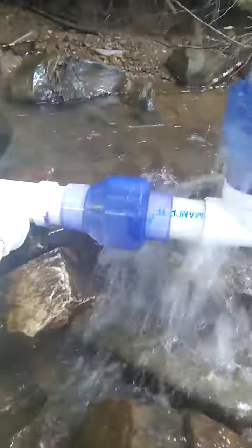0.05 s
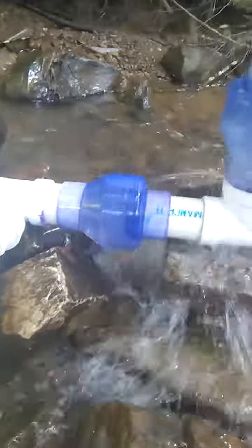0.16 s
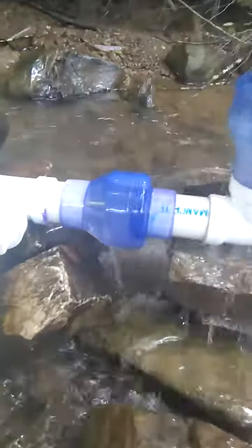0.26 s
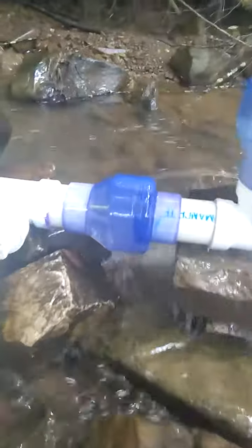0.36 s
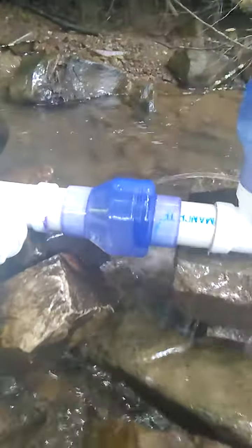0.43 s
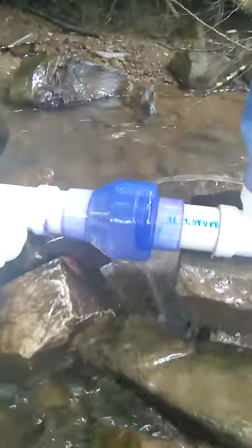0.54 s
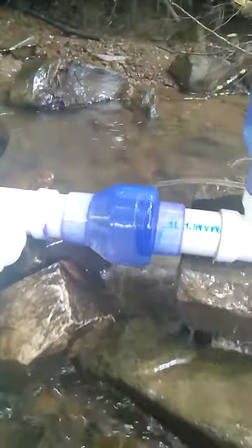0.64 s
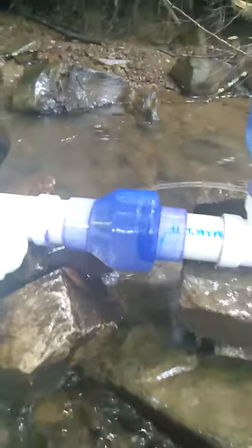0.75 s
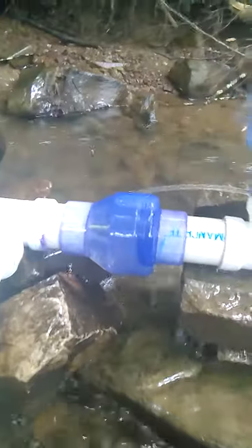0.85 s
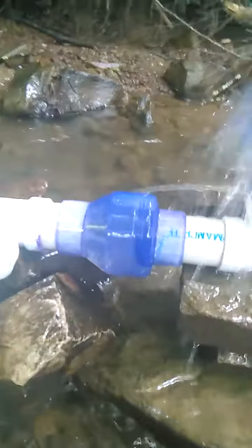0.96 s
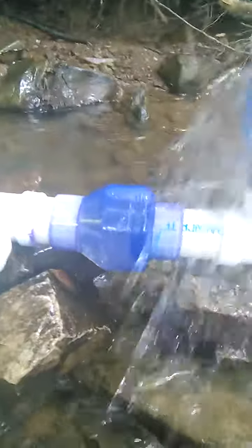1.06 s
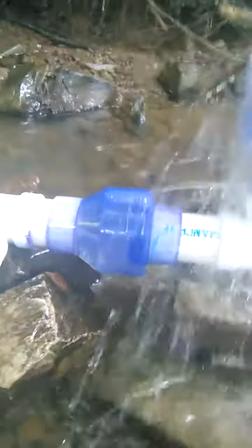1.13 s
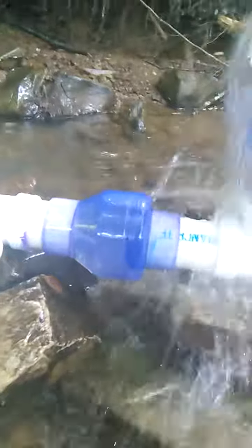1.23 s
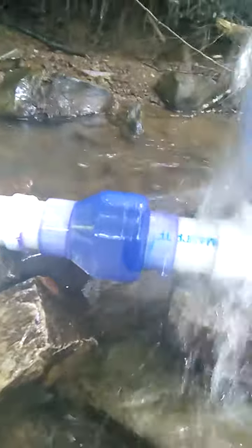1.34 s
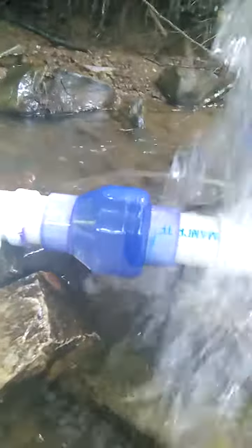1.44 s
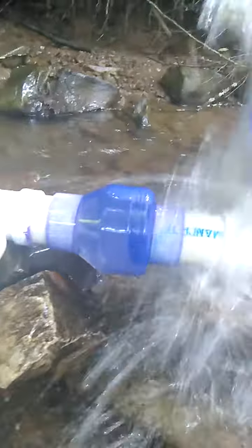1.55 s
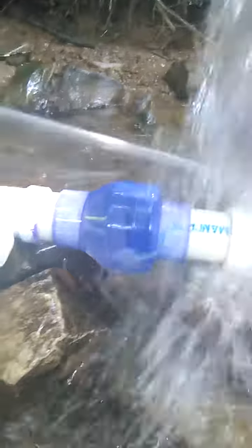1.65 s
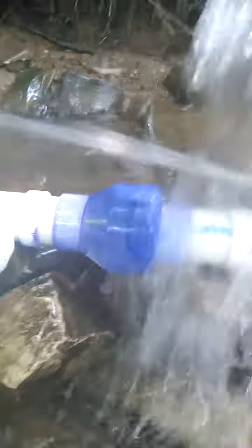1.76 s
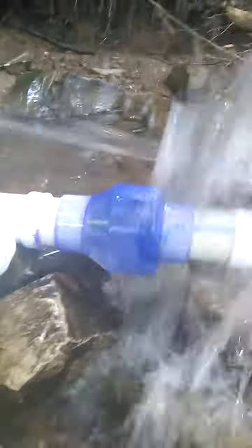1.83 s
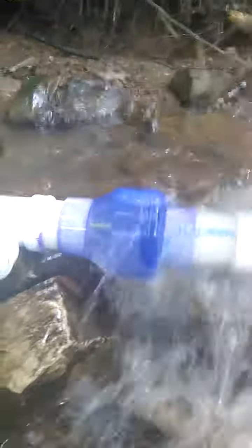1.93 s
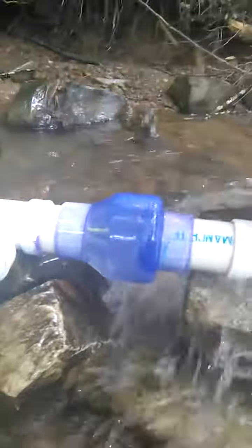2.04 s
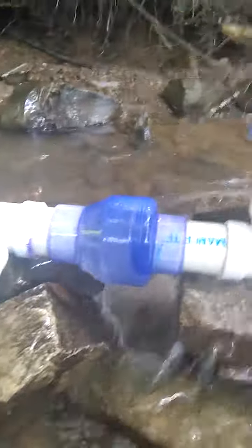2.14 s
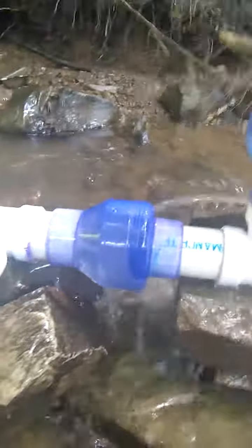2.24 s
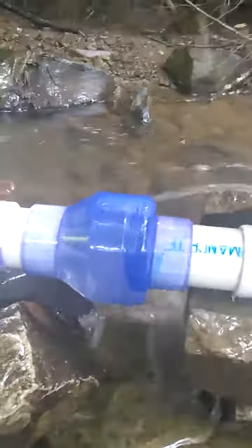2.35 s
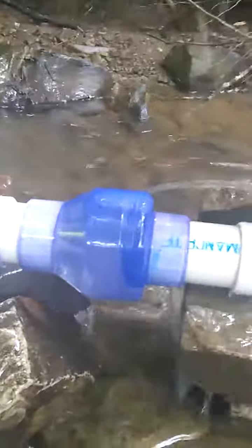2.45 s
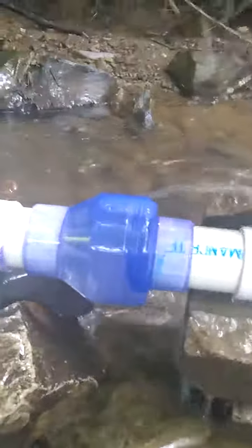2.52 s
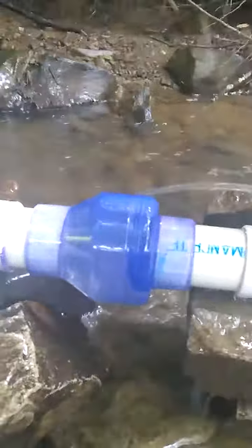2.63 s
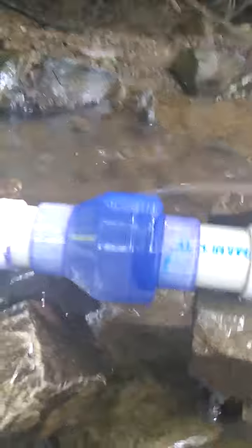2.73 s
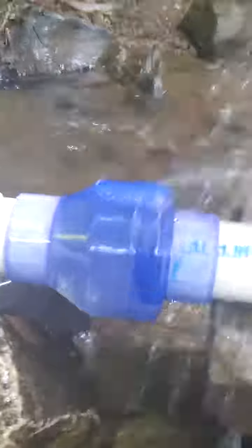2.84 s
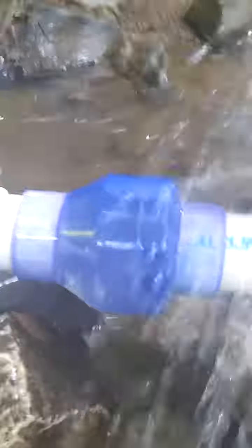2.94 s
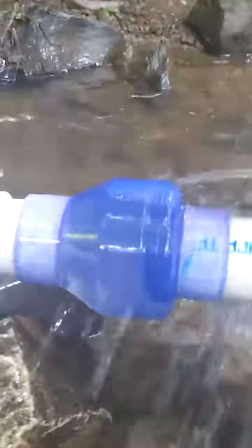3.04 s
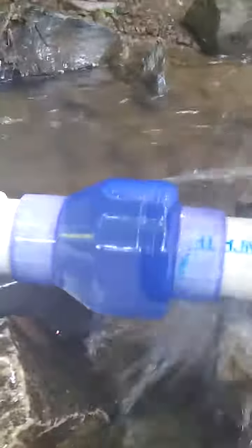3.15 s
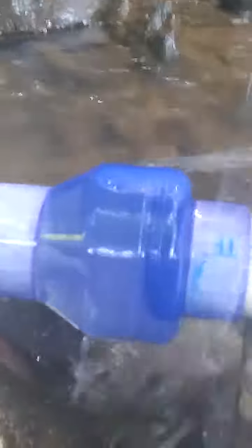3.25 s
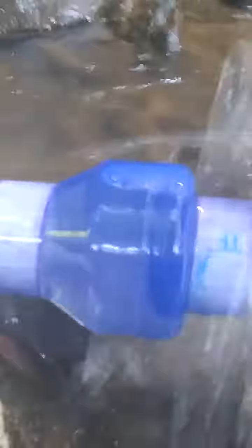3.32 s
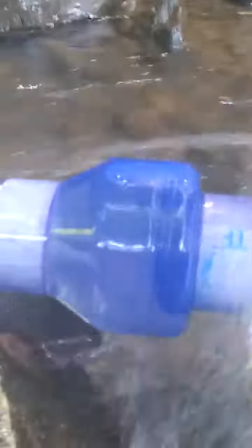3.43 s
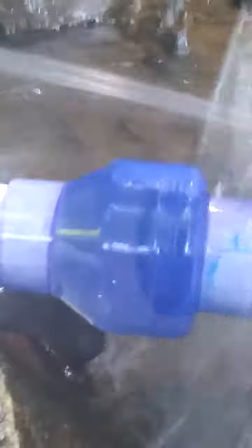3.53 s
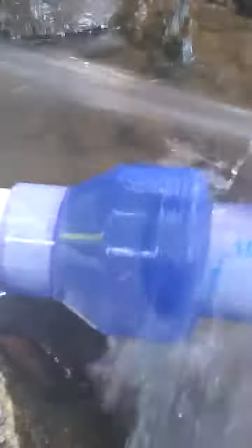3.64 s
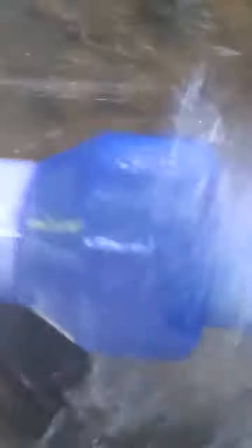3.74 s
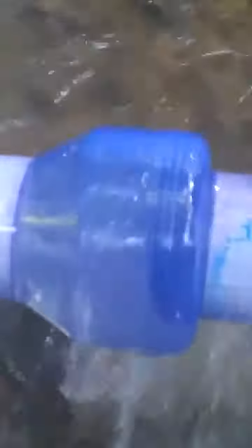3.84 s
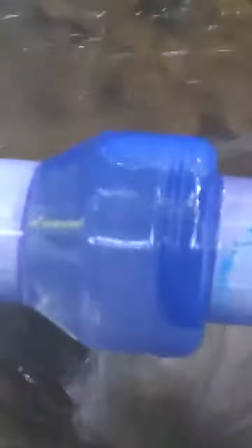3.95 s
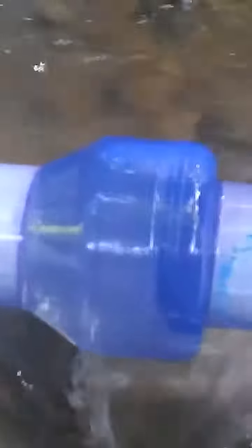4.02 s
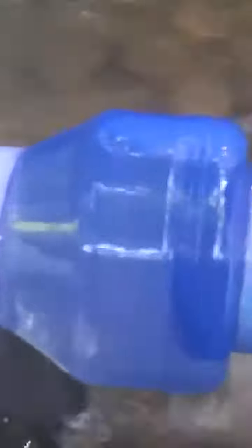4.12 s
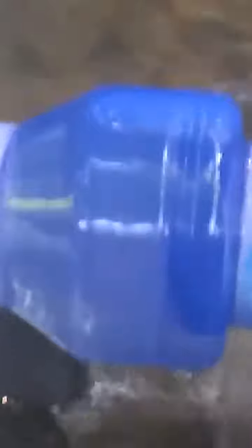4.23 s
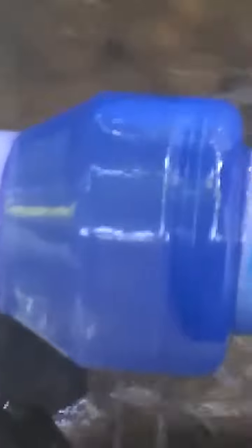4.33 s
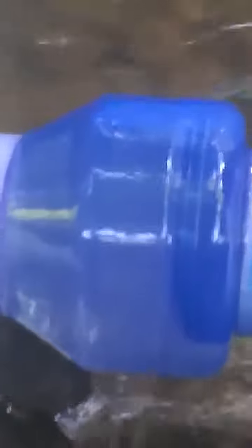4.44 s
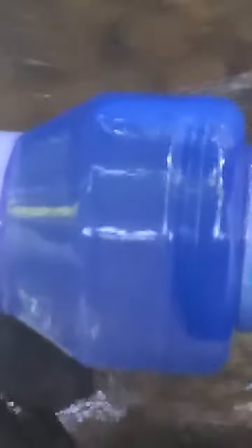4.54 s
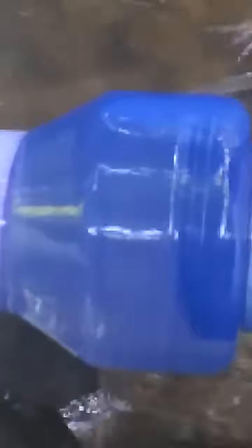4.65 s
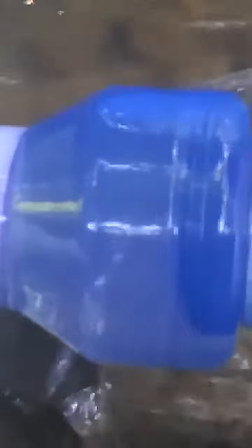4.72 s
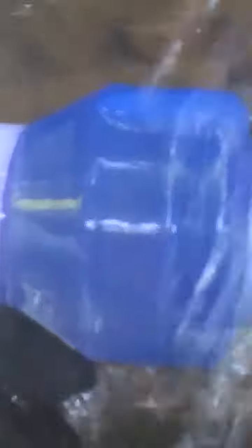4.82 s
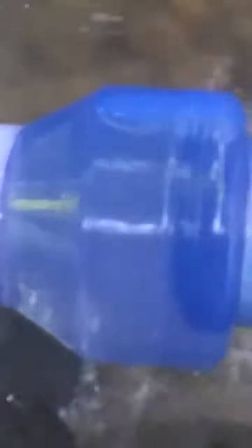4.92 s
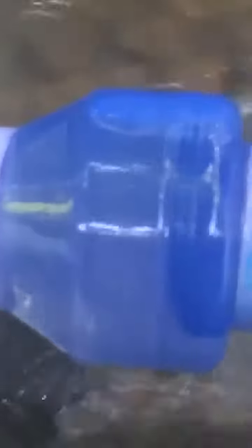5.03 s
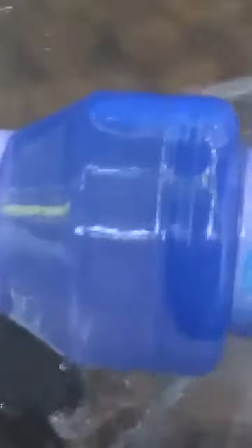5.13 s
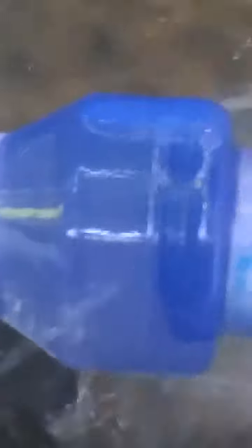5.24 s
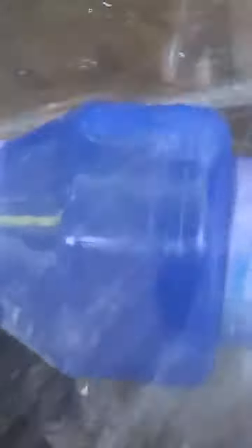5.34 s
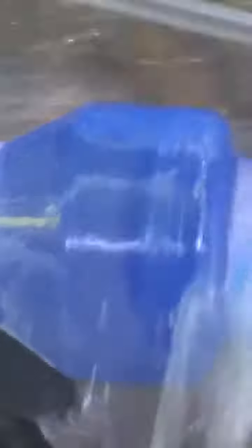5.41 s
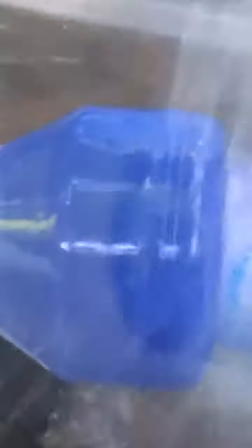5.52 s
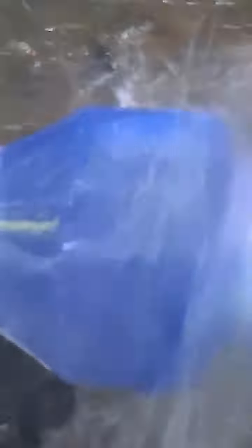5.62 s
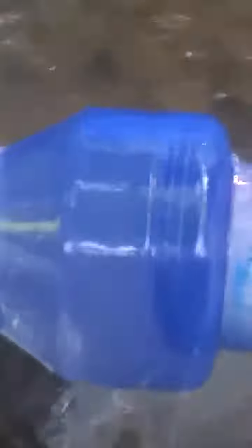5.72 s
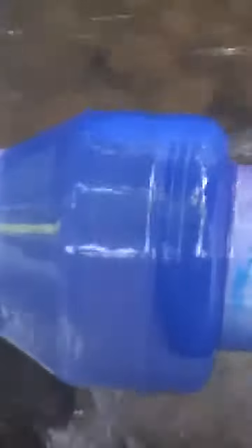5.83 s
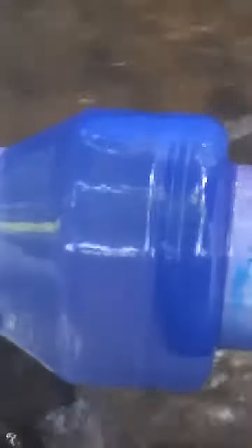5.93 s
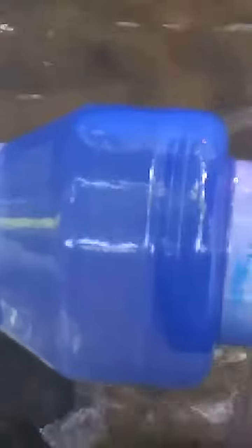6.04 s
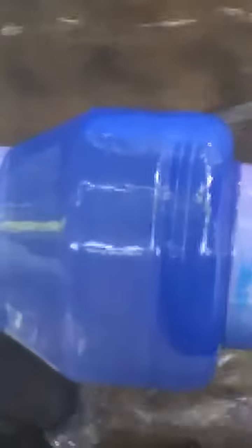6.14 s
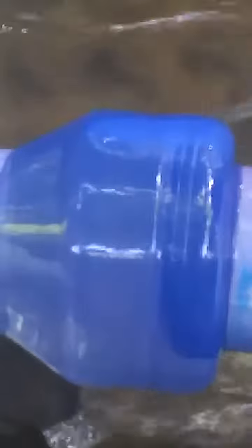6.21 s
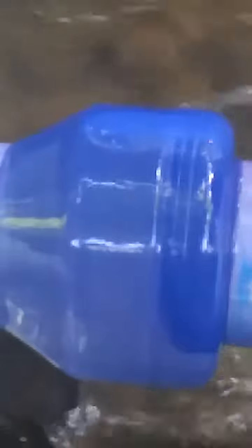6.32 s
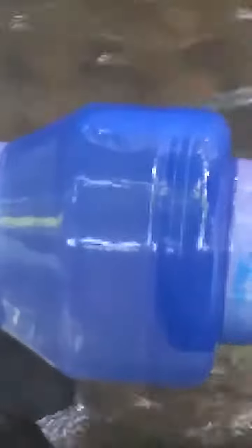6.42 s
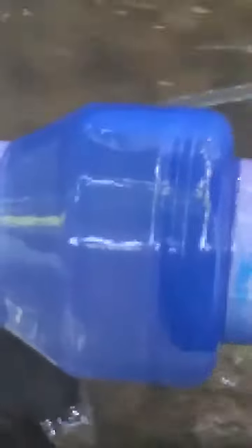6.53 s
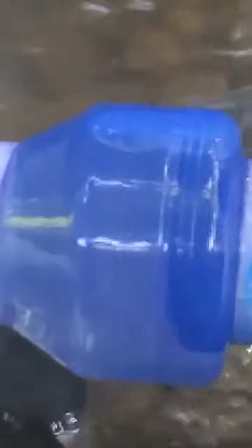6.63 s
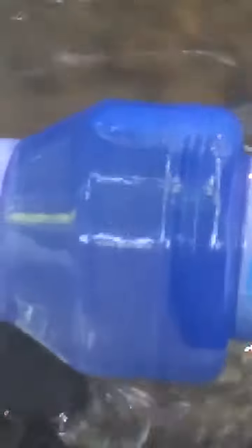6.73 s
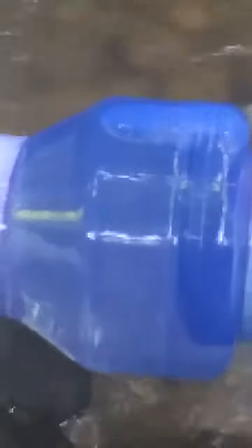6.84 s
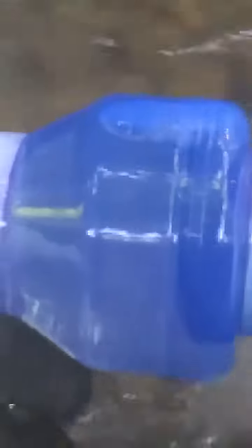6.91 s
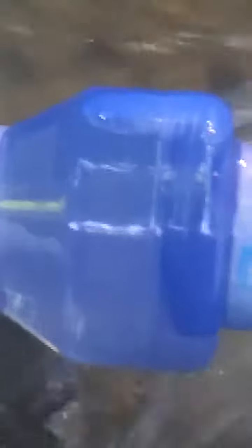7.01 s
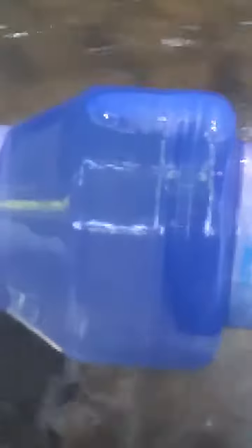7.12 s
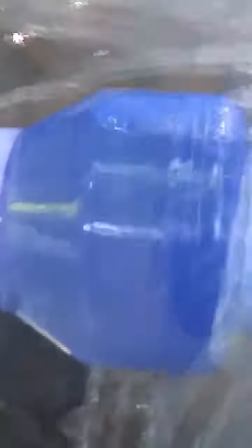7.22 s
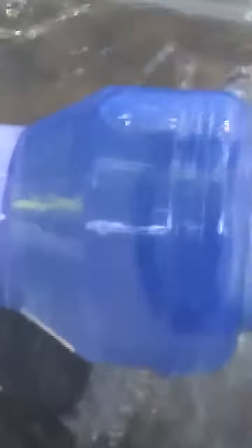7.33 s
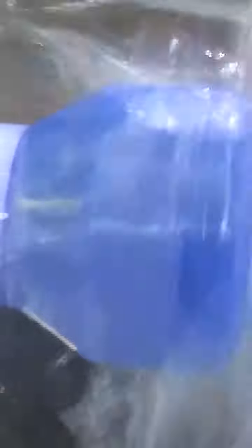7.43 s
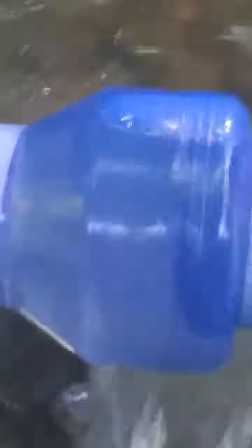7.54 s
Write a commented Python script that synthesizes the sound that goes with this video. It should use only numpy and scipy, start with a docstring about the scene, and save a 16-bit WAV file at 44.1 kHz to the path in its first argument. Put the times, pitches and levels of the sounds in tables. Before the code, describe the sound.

A tail of a hissing gush sounds at the very start and cuts off at about 0.1 s, leaving drips and a steady babbling creek with hollow glugs and low handling rumble. At 1.0 s water spurts again, splattering on stones, surging around 1.5 to 1.8 s with sharp splats, a dull pipe thud and thumping finger bumps, then stops near 2.0 s. A few more bumps follow over gurgling water. The next gush runs from 2.9 to 3.9 s, with bright plips and a hard splat at 3.5 s. A faint far engine climbs in pitch from about 2 s, shifts gear near 5.6 s and fades by 6.6 s. Further gushes run 4.8 to 5.8 s and from 6.7 s to the end at about 7.5 s, still spraying. Close, outdoors, crisp hiss over soft stream wash, wide stereo with the spray brighter at left and handling mostly at right.

```python
"""A gush of water hisses and splatters on stones over a babbling creek, and is cut off almost at once.
A ram pump throws out such a gush about every two seconds until its valve shuts: drop-shaped noise makes
the spray and splash, noise bursts the big drops, damped tones the plips. The creek is noise and bubbles.
A far engine, gliding tones, pulls away; fingers bump and rub the phone, heard as thumps and low noise.
Its two microphones are wired in opposite polarity; the left one sits behind a resonant port."""
import sys
import numpy as np
from scipy import signal
from scipy.fft import rfft, irfft, next_fast_len
from scipy.io import wavfile
from scipy.ndimage import uniform_filter1d, map_coordinates

SR = 44100
rng = np.random.default_rng(int(sys.argv[2]) if len(sys.argv) > 2 else 0)


def dump_mix(stems):
    """Bounce the given channels to the path in sys.argv[1] as a 16-bit WAV at rate SR."""
    frames = np.atleast_2d(stems).T  # one column per channel
    limited = np.clip(frames, -1, 1)  # hard clip at full scale
    pcm = np.round(limited * 32767).astype(np.int16)
    wavfile.write(sys.argv[1], SR, pcm)


N = 333837
T = np.arange(N) / SR
SLOW = T[::64]  # time grid of the slow controls, s

# spectrum of fine spray: f/Hz, relative density/dB
SPRAY_SPECTRUM = [(2500, -33), (4500, -5.5), (6500, -3), (8500, 1.5), (11000, 0), (12500, -2.5),
                  (14300, -6)]
# spectrum of heavier water on stones: f/Hz, relative density/dB
SPLASH_SPECTRUM = [(100, -75), (300, -43), (600, -18), (1000, -11), (2000, -4.5), (3400, -1), (5000, -2),
                   (7000, -2.5), (11000, -21)]


def amp(db):
    """dB to amplitude factor."""
    return 10 ** (np.asarray(db) / 20)


def unit(x):
    """Scales to an RMS of 1 over all channels."""
    return x / np.sqrt(np.mean(x ** 2) + 1e-20)


def along(points, hz):
    """(f/Hz, value) points read on a log frequency axis."""
    f_hz, value = np.transpose(points)
    return np.interp(np.log(hz + 1), np.log(f_hz + 1), value)


def curves(rows):
    """One value per sample for each column after the time."""
    s, *columns = np.transpose(rows)
    return [np.interp(T, s, column) for column in columns]


def wobble(knots_per_s):
    """Smooth random curve through normally distributed knots."""
    knots = rng.standard_normal(int(N * knots_per_s / SR) + 4)
    return map_coordinates(knots, [T * knots_per_s])


def filtered(x, response):
    """Applies a complex response of frequency to x."""
    m = next_fast_len(N + 8192)
    hz = np.fft.rfftfreq(m, 1 / SR)
    return irfft(rfft(x, m) * response(hz), m)[..., :N]


def patchy(patch_rms_db):
    """Two white noises that share time-frequency patches of random gain."""
    z = signal.stft(rng.standard_normal((2, N)), nperseg=256)[2]
    field = rng.standard_normal(z.shape[1:])
    field = uniform_filter1d(field, 4, 0)  # over frequency
    field = uniform_filter1d(field, 8, 1)  # over time
    return signal.istft(z * amp(patch_rms_db * unit(field)), nperseg=256)[1][:, :N]


def heard(pair, spectrum):
    """Colours two sources and mixes them so the microphones agree by frequency, best in the bass."""
    # agreement of the microphones: f/Hz, coherence/0-1
    agreement = [(100, 0.98), (350, 1), (700, 0.9), (1100, 0.58), (1700, .45), (2300, 0.7), (3400, 0.6),
                 (4200, 0), (14000, 0.18)]
    colour = lambda hz: amp(along(spectrum, hz))
    alike = lambda hz: np.clip(along(agreement, hz), 0, 1)
    left = filtered(pair[0], colour)
    shared = filtered(pair[0], lambda hz: colour(hz) * alike(hz))
    own = filtered(pair[1], lambda hz: colour(hz) * np.sqrt(1 - alike(hz) ** 2))
    return np.array([left, shared + own])


def patter(drops_per_s, spread_db, t60_s):
    """Power envelope of mean 1: drops land at random, each a sudden start and a quick decay."""
    sizes = amp(2 * spread_db * rng.exponential(size=N))
    hits = sizes * (rng.random(N) < drops_per_s / SR)
    power = signal.lfilter([1], [1, -amp(-120 / (t60_s * SR))], hits)
    return power / power.mean()


def bubbles(s, db, hz, t60_s, rise, attack):
    """Damped tones whose pitch climbs as the bubble nears the surface."""
    t = np.arange(int(min(t60_s.max(), .1) * SR)) / SR
    u = t / t60_s[:, None]  # age in decay times
    tone = np.sin(2 * np.pi * hz[:, None] * t * (1 + rise * u))
    tone = tone * amp(db[:, None] - 60 * u) * (1 - np.exp(-u / attack))
    at = (s * SR).astype(int)[:, None] + np.arange(len(t))
    return np.bincount(at.ravel(), tone.ravel(), N + SR)[:N]


def thumps(rows, decay):
    """Each thump is a cycle or two that slows down."""
    out, t = np.zeros(N + SR), np.arange(SR // 10) / SR
    for s, db, hz in rows:
        u = hz * t
        thump = amp(db) * np.sin(2 * np.pi * 1.25 * u ** 0.575) * np.exp(-decay * u)
        out[round(s * SR):][:len(t)] += thump
    return out[:N]


def engine():
    """Low tones of a far engine that speeds up, then drops to a higher gear."""
    # before the gear change: t/s, firing f/Hz, firing level/dB, octave level/dB
    pulling = [(1.6, 78.3, -82, -85), (2.3, 104.3, -59, -82), (3.0, 118.2, -60, -79), (3.5, 134, -61, -76),
               (4.2, 163, -61, -66), (4.5, 172.6, -77, -61), (4.9, 193, -76, -62), (5.4, 205.6, -83, -59),
               (5.6, 204, -90, -87)]
    # after it: t/s, f/Hz (only 2f and 3f sound), level/dB
    geared = [(5.6, 70, -88), (5.8, 73, -66), (6.1, 77, -59), (6.6, 81, -85)]
    hz, firing_db, octave_db = curves(pulling)
    phase = 2 * np.pi * np.cumsum(hz + 0.42 * wobble(4.8)) / SR
    firing = amp(firing_db + 1.2 * wobble(5.2)) * np.sin(phase)
    octave = amp(octave_db + 1.5 * wobble(4.1)) * np.sin(2 * phase)
    hz, db = curves(geared)
    phase = 2 * np.pi * np.cumsum(hz) / SR
    harmonics = 0.71 * np.sin(2 * phase) + 0.89 * np.sin(3 * phase)
    return firing + octave + amp(db + 1.6 * wobble(23)) * harmonics


def creek():
    """A steady wash with many small bubbles and a few large ones."""
    # wash spectrum: f/Hz, relative density/dB
    wash_spectrum = [(30, -33), (60, -2.5), (170, -8.5), (260, -6.5), (500, -2), (700, -1), (1000, -3),
                     (1700, -7), (2600, -13.5), (4500, -14), (8500, -9.5), (11000, -13.5), (14300, -20)]
    # large bubbles: t/s, level/dB, start f/Hz, t60/s
    glugs = [(.47, -38, 550, .12), (.52, -46, 696, 0.067), (1.89, -41, 720, .06), (2.24, -35, 536, 0.12),
             (2.51, -41, 557, 0.11), (3.13, -40, 688, 0.12), (3.23, -37, 536, .08), (3.38, -38, 810, 0.067),
             (4.73, -36, 547, 0.087), (5.38, -42, 600, 0.093), (5.6, -40, 440, 0.15),
             (7.14, -44, 810, 0.089), (7.417, -42, 462, .09)]
    trickle = np.sqrt(2.1 + 0.1 * patter(400, spread_db=1.0, t60_s=0.0044))
    wash = unit(heard(patchy(3.0) * trickle, wash_spectrum))
    wash = amp(-52.5 + 0.82 * wobble(3.06)) * wash * amp([[2.5], [0]])
    u = rng.random((900, 3))
    hz = np.clip(600 * amp(3.53 * rng.standard_normal(900)), 300, 2000)
    t60_s = 35 / hz * (1.2 + u[:, 2])
    babble = bubbles(u[:, 0] * N / SR, -62 + 11 * u[:, 1] ** 2, hz, t60_s, rise=0.17, attack=0.017)
    large = bubbles(*np.transpose(glugs), rise=.3, attack=0.02)
    return wash + (babble + large) * amp([[-.8], [0]])


def handling():
    """Finger bumps and rumble reach the microphones through the case, the right one far more."""
    # bumps: t/s, level/dB before decay, nominal f/Hz
    bumps = [(1.734, -37, 170), (1.758, -28.5, 151), (1.79, -34.5, 120), (1.824, -36, 180),
             (1.855, -40, 120), (1.888, -36.5, 222), (1.909, -51, 150), (2.12, -29.5, 200),
             (2.18, -34, 200), (2.207, -38.5, 200), (2.297, -39.5, 252), (2.482, -35, 201),
             (2.76, -48, 250), (2.916, -38, 200), (3.31, -39, 200), (3.763, -39.5, 198),
             (4.216, -39.5, 200), (4.744, -46, 69.6), (5.337, -48, 70), (6.62, -48, 180), (6.66, -50, 180),
             (6.985, -44, 200)]
    # fingers shifting on the case: start/s, length/s, rumble level/dB
    rubs = [(0, .03, -58), (.09, .42, -55), (.62, .06, -59), (.76, .07, -56), (.92, .03, -61),
            (1.205, .01, -59), (1.335, .01, -65), (1.73, .2, -50), (2.1, .1, -58), (2.47, .01, -62),
            (3.24, .12, -63), (4.21, .02, -62), (5.33, .03, -55), (7.27, .12, -65)]
    # rumble spectrum: f/Hz, relative density/dB
    rumble_spectrum = [(20, -39), (45, -1), (90, 1.5), (160, -5.5), (400, -38)]
    grip_db, edge_s = -74, .03  # steady grip; fade in and out of a rub
    lumpy = amp(2.9 * wobble(30)) * rng.standard_normal(N)
    rumble = unit(filtered(lumpy, lambda hz: amp(along(rumble_spectrum, hz))))
    rubbing = np.zeros(len(SLOW))
    for s, length_s, db in rubs:
        corners_s = [s - edge_s, s, s + length_s, s + length_s + edge_s]
        rubbing += amp(db) * np.interp(SLOW, corners_s, [0, 1, 1, 0])
    level = amp(grip_db + 4 * wobble(6)) + np.interp(T, SLOW, rubbing)
    return (thumps(bumps, decay=1.0) + level * rumble) * [[.05], [1]]


def valve():
    """Dull thuds of the valve carried by the pipe."""
    # t/s, level/dB before decay, nominal f/Hz
    thuds = [(1.633, -45, 150), (1.649, -39, 150), (3.525, -40, 140), (3.7, -48, 90), (5.383, -48, 120),
             (5.4, -49, 150), (7.268, -48, 110), (7.463, -52, 170)]
    return thumps(thuds, decay=0.99)


def splats():
    """Each big drop is a short burst of spray and splash: a smack, then scattering droplets."""
    # t/s, spray level/dB, splash re spray/dB, right re left/dB
    big_drops = [(0.4204, -38, -15, -4), (0.692, -40, -21, -5), (1.0175, -39, -14, 10),
                 (1.0284, -35, -14, 4), (1.162, -31, -16, 0), (1.1697, -29, -14, 0), (1.197, -24, -18, 3),
                 (1.2441, -34, -16, 10), (1.3205, -34, -15, 10), (1.487, -26.5, -2, 3),
                 (1.5331, -21.5, -19, -4), (1.5664, -30, -12, 2), (1.5875, -15, -16, -2),
                 (1.603, -22.5, -15, 2), (1.6726, -17, -24, -7), (1.8687, -19, -18, -10),
                 (1.8933, -29.5, -4, 5), (1.9608, -18, -22, 2), (2.025, -28, -15, 7),
                 (2.1804, -32.5, -22, -2), (2.2971, -39.5, -6, 13), (2.3968, -37, -15, 3),
                 (2.4194, -38.5, -11, -4), (2.7616, -46, -1, 13), (3.073, -26, -3.5, 3),
                 (3.2106, -29.5, -14, 8), (3.431, -32, -2, 9), (3.5164, -22, -8, 5),
                 (3.5265, -13.5, -19, -15), (3.5962, -25, -15, -2), (4.1017, -37.5, -19, 3.5),
                 (4.796, -33, -20, 5), (4.8439, -28.5, -20, 2), (4.8943, -38.5, -13, 17),
                 (5.015, -26, -18, 5), (5.046, -22.5, -6, 2), (5.0886, -20, -17, 2), (5.1998, -28, -6, 1),
                 (5.216, -18, -8, -1), (5.2277, -20, -18, 2.5), (5.3096, -28, -12, 5),
                 (5.3906, -21, -3.5, 5.5), (5.4207, -17, -19, -2), (5.5623, -17, -27, -9),
                 (5.6086, -20, -12, -10), (5.652, -21, -9, 8), (6.6855, -37, 0, 2), (6.705, -29, -11, 2),
                 (6.9504, -31, -8, 9), (7.125, -24.5, 0, -1), (7.231, -23, -18, 5), (7.2977, -20, -22, -4),
                 (7.3674, -27, -10, 0), (7.388, -27, -13, 0), (7.4017, -25, -16, -4), (7.4081, -15, -12, 2),
                 (7.5034, -27, -6, 13)]
    smack_t60_s, scatter_db, scatter_t60_s = .008, -12, .035
    high, low = np.zeros((2, N + SR)), np.zeros((2, N + SR))
    t = np.arange(SR // 20) / SR
    fall = amp(-60 * t / smack_t60_s) + amp(scatter_db - 60 * t / scatter_t60_s)
    shape = fall * (1 - np.exp(-t / 0.00048))
    for s, db, splash_db, right_db in big_drops:
        burst = amp(db) * shape * amp([[0], [right_db]])
        high[:, round(s * SR):][:, :len(t)] += burst
        low[:, round(s * SR):][:, :len(t)] += burst * amp(splash_db)
    signs = np.sign(rng.standard_normal((2, 2, N)))  # random signs: white noise under the bursts

    def coloured(noise, spectrum):
        power = np.mean(amp(2 * along(spectrum, np.linspace(0, SR / 2, 4096))))
        return heard(noise, spectrum) / np.sqrt(power)

    return coloured(signs[0] * high[:, :N], SPRAY_SPECTRUM) + coloured(signs[1] * low[:, :N], SPLASH_SPECTRUM)


def flow():
    """Spray and splash in dB: each gush rises, surges, sags, falls at the shut and drips off; slugs swell it."""
    # one row a gush: valve opens/s, rise/s, jet surges/s, surge takes/s, valve shuts/s,
    # first flow/dB, full jet/dB, jet at the shut/dB, splash/dB
    gushes = [(-.9, .1, -.4, .1, .11, -42, -30, -32, -42), (1.0, .17, 1.47, .3, 2.01, -43, -34, -37.5, -43),
              (2.93, .08, 3.3, .33, 3.86, -40.5, -33.5, -37, -43.5),
              (4.78, .11, 5.36, .06, 5.76, -41.5, -32, -38, -43.5),
              (6.67, .05, 7.1, .2, 7.7, -40.5, -35, -35.5, -43)]
    # slugs that swell the jet and gaps that thin it: t/s, spray change/dB, splash change/dB
    slugs = [(.072, -6, -3), (.103, 2, 4), (.14, 3, 3), (1.18, 2, 0), (1.31, -4, -4), (1.37, 3, 3),
             (1.64, 2, 3), (1.69, 2, 2), (1.725, 5, 0), (1.775, -2, -1), (1.825, 7, 3), (1.87, 3, 3),
             (1.935, -3, -3), (1.965, 6, 0), (3.045, -3, -2), (3.34, 2, 2), (3.56, 2, 4), (3.67, 4, 3),
             (3.815, -3, -2), (3.855, 4, 5), (4.175, 6, 2), (4.24, 4, 2), (5.0, -4, -2), (5.1, 3, 4),
             (5.17, 2, 2), (5.295, -3, -3), (5.5, 1, 3), (5.57, 3, 0), (5.655, 4, 4), (5.69, -3, -3),
             (5.745, 4, 5), (6.765, -4, -1), (6.79, 2, 3), (6.98, 2, 2), (7.035, -3, -2), (7.3, 3, 0),
             (7.4, 2, -3), (7.435, -3, -4), (7.5, 3, 5), (7.55, -4, -3)]
    shut_db, seep_db = -75, -65  # spray with the valve shut; water running off the stones all along
    rise_from_db = -15  # re first flow
    fall_db_per_s, drip_db, drip_db_per_s = 125, -13, 20  # airborne water lands, then the stones drip off
    slug_sigma_s, surge_db, surge_knots_per_s = .016, .8, 30
    t = SLOW
    spray_power, splash_power = amp(2 * shut_db), amp(2 * seep_db)
    for opens, rise, surges, takes, shuts, first_db, full_db, last_db, splash_db in gushes:
        after = np.maximum(t - shuts, 0)
        fall = amp(-2 * fall_db_per_s * after) + amp(2 * (drip_db - drip_db_per_s * after))
        rising = amp(2 * np.interp(t, [opens, opens + rise], [rise_from_db, 0]))
        shape = (t > opens) * rising * fall
        jet_db = np.interp(t, [surges, surges + takes, shuts], [first_db, full_db, last_db])
        spray_power = spray_power + shape * amp(2 * jet_db)
        splash_power = splash_power + shape * amp(2 * splash_db)
    swells_db = np.zeros((2, len(t)))
    for s, spray_db, splash_db in slugs:
        swells_db += np.exp(-.5 * ((t - s) / slug_sigma_s) ** 2) * np.array([[spray_db], [splash_db]])
    levels_db = 10 * np.log10([spray_power, splash_power]) + swells_db
    return [np.interp(T, t, db) + surge_db * wobble(surge_knots_per_s) for db in levels_db]


def gush():
    """Fine spray hisses; heavier water splashes on the stones and plips into the pool; all made of drops."""
    # clear drops that trap a small bubble entering the pool: t/s, level/dB before decay, start f/Hz
    pool_drops = [(0.0915, -20, 2600), (1.1244, -31.5, 2520), (1.2155, -29.5, 2730), (1.5544, -30.5, 2380),
                  (1.567, -26.5, 2580), (1.8282, -28.5, 2060), (2.0637, -35.5, 2180), (2.9577, -33, 2340),
                  (3.027, -26.5, 2590), (3.1343, -29.5, 2360), (3.1797, -21.5, 2380), (3.2124, -30.5, 2490),
                  (3.274, -29.5, 2480), (3.328, -26, 2280), (3.4256, -27.5, 2300), (3.456, -24, 2680),
                  (3.4895, -26, 2320), (4.2477, -34.5, 2630), (4.9797, -27.5, 2370), (5.0375, -20.5, 2440),
                  (5.1537, -23.5, 2460), (5.6517, -21.5, 2160), (5.661, -22.5, 2440), (6.6807, -31.5, 2920),
                  (6.768, -29.5, 2410), (6.791, -22.5, 2470), (6.8129, -28.5, 2350), (6.8588, -28, 2250),
                  (6.875, -24.5, 3000), (6.9047, -26.5, 2520), (6.9834, -29.5, 2310), (7.1402, -25.5, 2550),
                  (7.4644, -28.5, 2180)]
    spray_db, splash_db = flow()
    small = patter(970, spread_db=1.0, t60_s=0.0068)
    large = patter(70, spread_db=1.5, t60_s=0.039)
    spray = unit(heard(patchy(1.5) * np.sqrt(.5 + .25 * small + .2 * large), SPRAY_SPECTRUM))
    wet = patter(200, spread_db=2.0, t60_s=0.019)
    splash = unit(heard(patchy(3.3) * np.sqrt(0.39 + 0.38 * wet + 0.14 * large), SPLASH_SPECTRUM))
    # fizz of tiny bubbles, partly shared by the microphones
    u = rng.random((3000, 4))
    hz = np.clip(3000 * amp(2.55 * rng.standard_normal(3000)), 1700, 9000)
    s, db = u[:, 0] * N / SR, 14 * u[:, 1] ** 2
    fizz = [unit(bubbles(s[c::2], db[c::2], hz[c::2], 12 / hz[c::2], rise=0.26, attack=0.017))
            for c in (0, 1)]
    splash = splash + amp(-9) * np.array([fizz[0], 0.86 * fizz[0] + 0.63 * fizz[1]])
    s, db, hz = np.transpose(pool_drops)
    plips = bubbles(s, db, hz, 16 / hz, rise=0.14, attack=0.03) * amp([[0], [-1.5]])
    return amp(spray_db) * spray + amp(splash_db) * splash + plips


def scene():
    """Sum of all sources, left and right."""
    background = engine() * amp([[.6], [0]]) + creek() + handling()
    return background + valve() + splats() + gush()


def record(dry):
    """The left port colours and lags, the right capsule inverts, loud peaks saturate, the top is cut off."""
    # left port re right: f/Hz, gain/dB
    port_gain = [(100, 2), (1000, 3.5), (1700, 4.5), (2050, 8), (2320, 13.5), (2650, 7.5), (3000, 5.5),
                 (3600, 3.5), (4150, 4.5), (4500, 8.5), (4900, 1.5), (7000, 1.5), (9000, 4), (11600, 15.5),
                 (14300, 12.5)]
    # left port re right: f/Hz, phase lag/rad
    port_lag = [(100, .05), (700, .05), (1700, .3), (2300, 1.1), (2600, 2), (3450, 3.1), (4500, 5),
                (14300, 11)]
    top_hz = 14300
    left = filtered(dry[0], lambda hz: amp(along(port_gain, hz)) * np.exp(-1j * along(port_lag, hz)))
    both = np.array([left, -dry[1]])
    both = both / (1 + np.abs(both / .85) ** 4) ** (1 / 4)  # soft saturation
    return filtered(both, lambda hz: hz < top_hz)


dry = scene()
out = record(dry)
dump_mix(out)
```